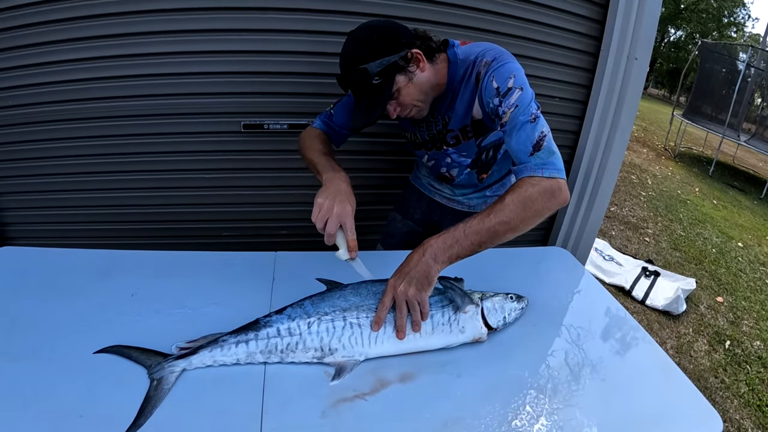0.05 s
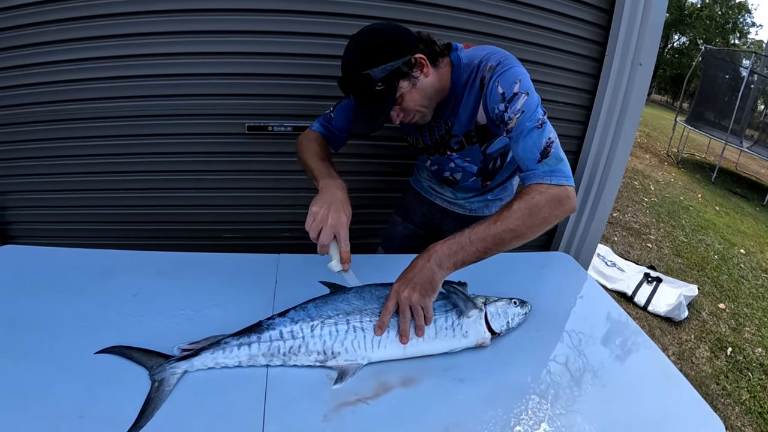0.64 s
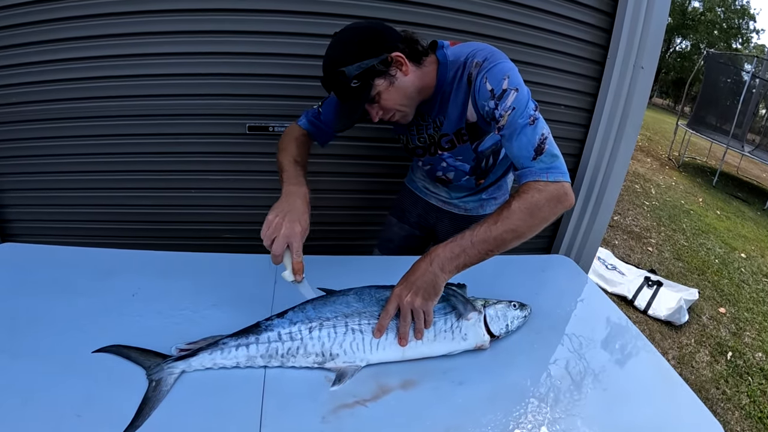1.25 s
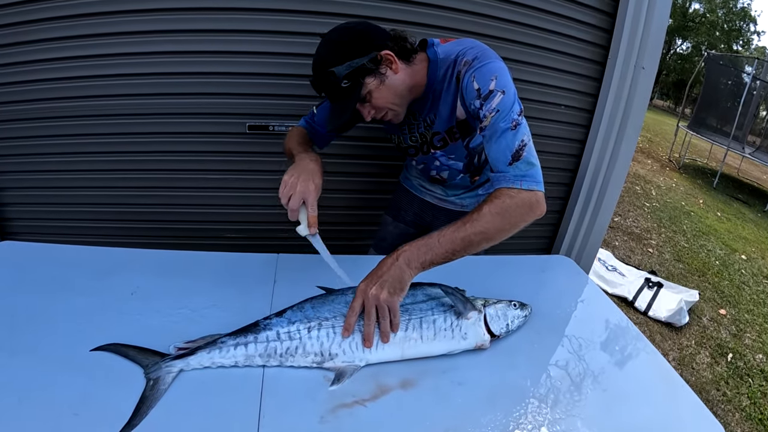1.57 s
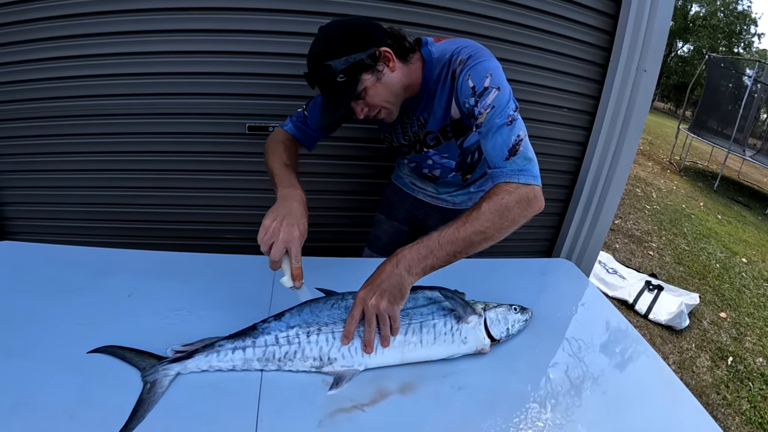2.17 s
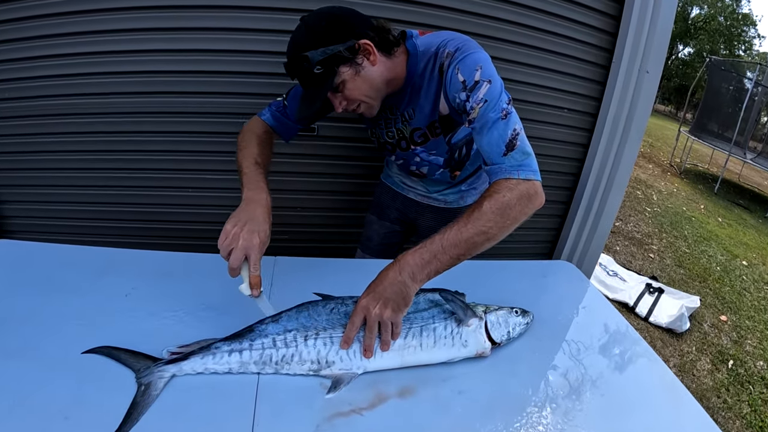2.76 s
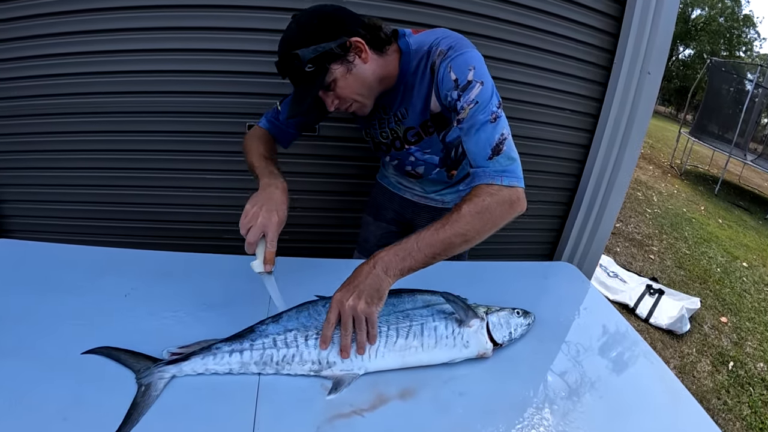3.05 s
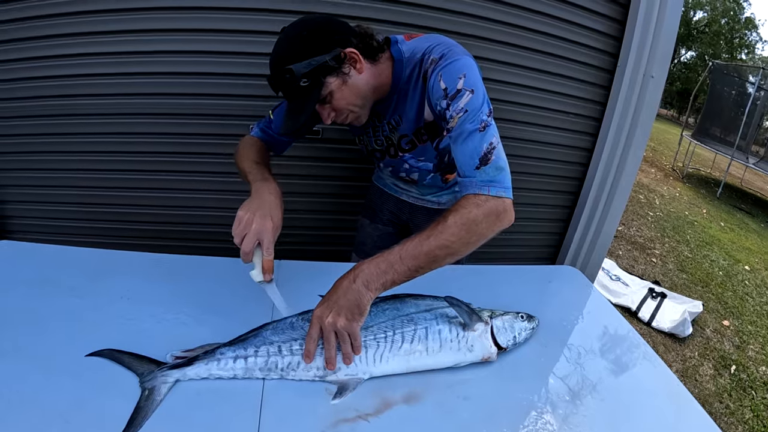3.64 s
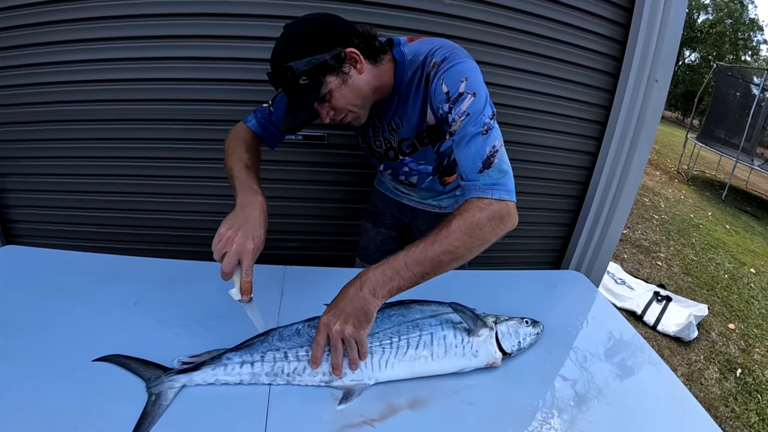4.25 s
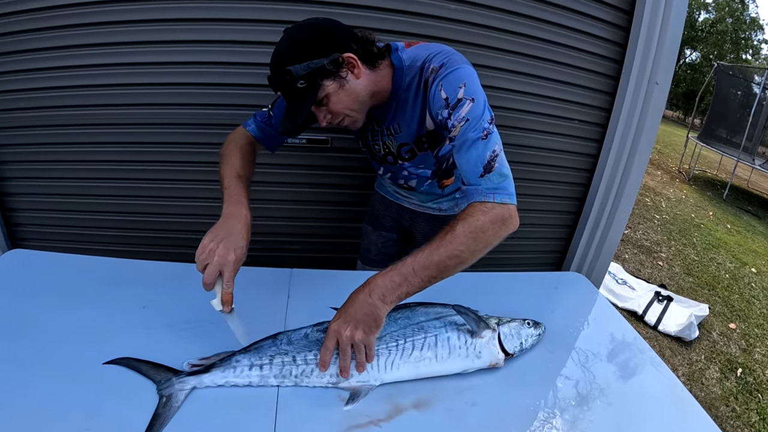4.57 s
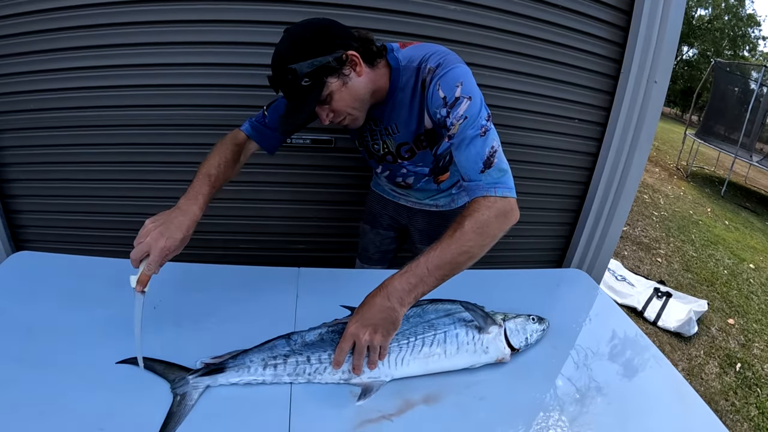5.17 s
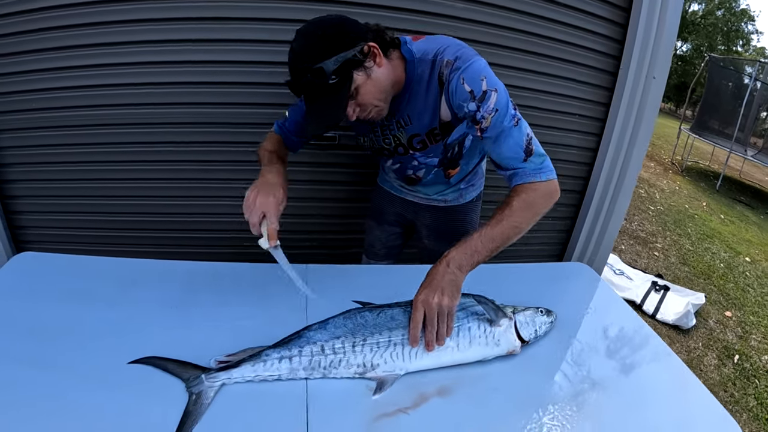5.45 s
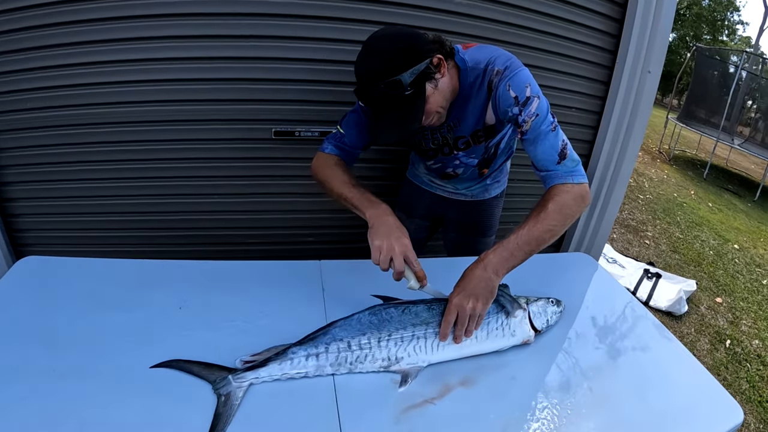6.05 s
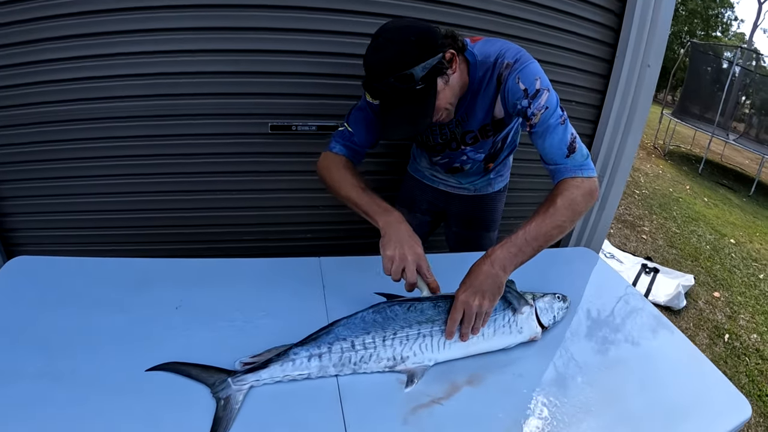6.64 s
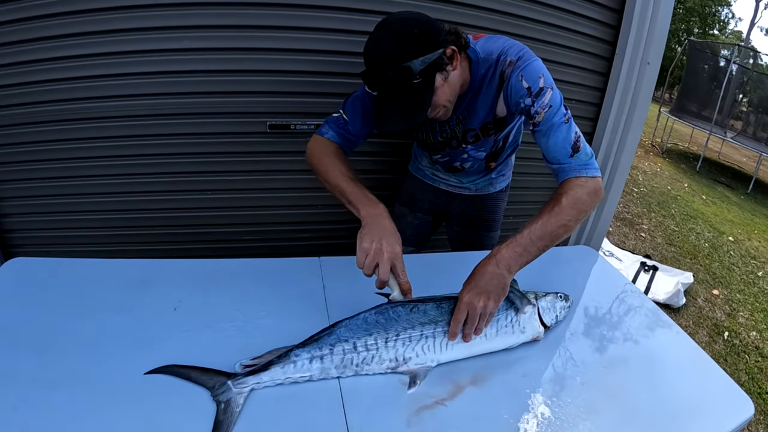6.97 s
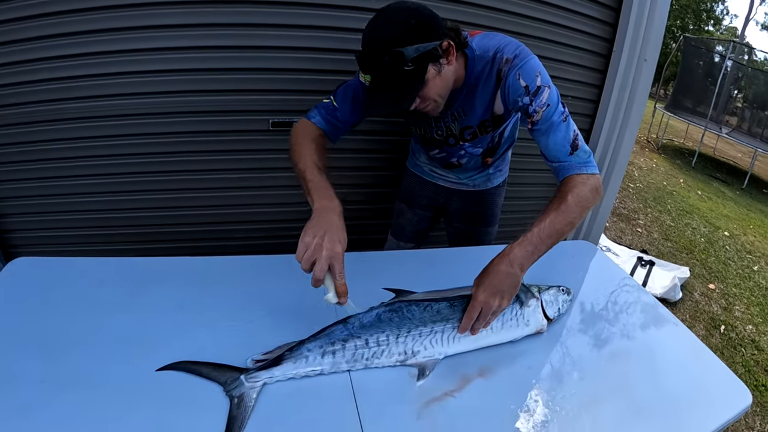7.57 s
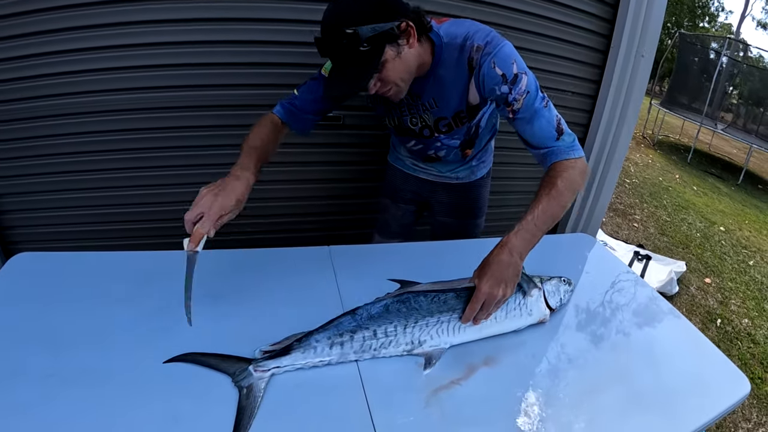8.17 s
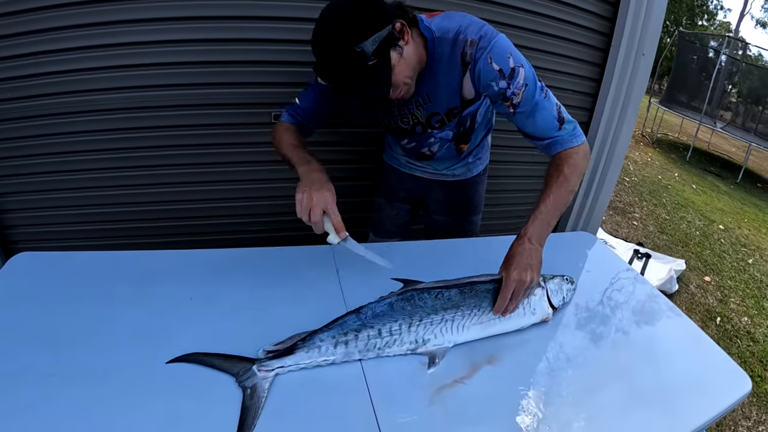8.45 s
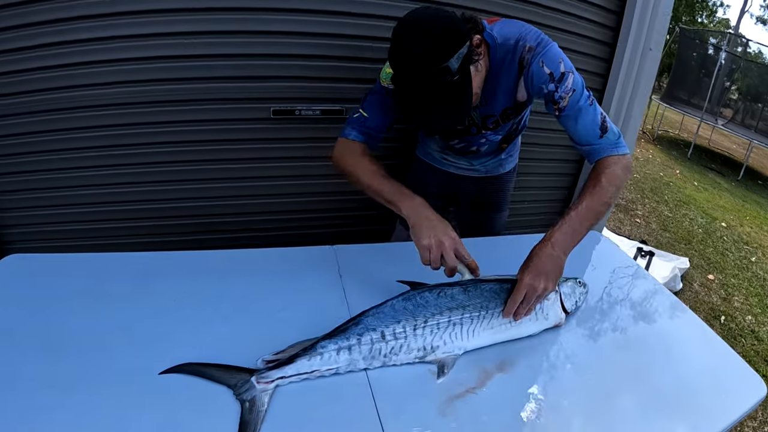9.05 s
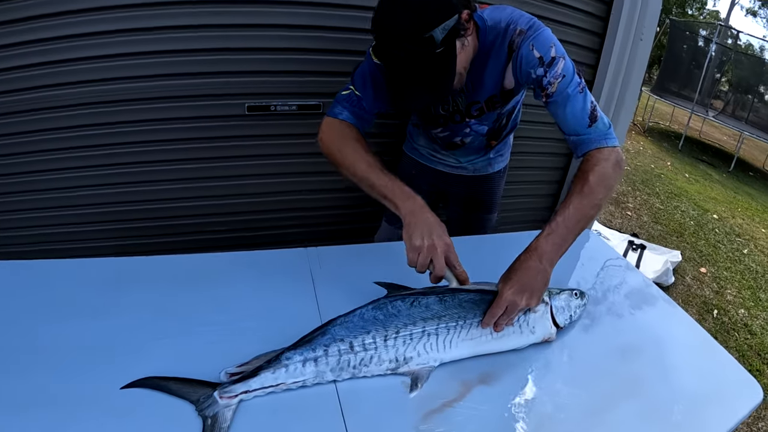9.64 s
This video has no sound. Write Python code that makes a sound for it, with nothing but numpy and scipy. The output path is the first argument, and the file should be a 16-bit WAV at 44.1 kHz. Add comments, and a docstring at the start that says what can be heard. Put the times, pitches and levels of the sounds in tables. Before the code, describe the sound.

A knife rasps and clicks through a fish outdoors, over the low throb of a distant helicopter and wind on the microphone.

```python
"""A knife fillets a fish on a plastic table in a yard. The edge rasps through skin and small bones,
the springy blade flicks out of two long cuts and jolts the fish, and a bone cracks near the head.
Far off a helicopter passes, each rotor blade giving a thump, a slap and a swirl of air.
Behind it are a soft wash of air, gusts on the microphone and faint bird calls."""
import sys
import numpy as np
from scipy import signal
from scipy.fft import rfft, irfft, next_fast_len
from scipy.io import wavfile
from scipy.ndimage import uniform_filter1d

SR = 44100
rng = np.random.default_rng(int(sys.argv[2]) if len(sys.argv) > 2 else 0)


def unload_audio(sound):
    """Save the sound as a 16-bit wav file, at the path given as the first command line argument."""
    columns = np.transpose(np.atleast_2d(sound))
    # keep every value between -1 and 1, then stretch to whole-number steps
    steps = np.round(np.clip(columns, -1, 1) * 32767)
    wavfile.write(sys.argv[1], SR, steps.astype(np.int16))


N = 432621
TIME = np.arange(N) / SR
SIDES = np.array([[1], [-1]])  # left, right
TOP_HZ = 14400


def undb(db):
    """Decibels to gain."""
    return 10 ** (np.asarray(db) / 20)


def unit(x):
    """Scale to rms 1."""
    return x / np.sqrt(np.mean(x ** 2) + 1e-18)


def curves(table):
    """Interpolate each column over the times in the first."""
    times, *columns = np.transpose(table)
    return [np.interp(TIME, times, column) for column in columns]


def add(track, start_s, sound):
    """Mix a sound into a track."""
    i = max(int(start_s * SR), 0)
    track[i:i + len(sound)] += sound[:max(N - i, 0)]


def colour(x, spectrum, causal=False):
    """Filter by (Hz, dB) points, keeping the power of white noise; causal for sharp attacks."""
    size = next_fast_len(N + SR // 2, True) // 2 * 2
    hz, db = np.transpose(spectrum)
    bin_hz = np.fft.rfftfreq(size, 1 / SR) + 1
    gain = undb(np.interp(np.log(bin_hz), np.log(hz), db))
    gain = unit(gain / (1 + (bin_hz / hz[-1]) ** 4))
    if causal:  # minimum phase
        cepstrum = irfft(np.log(gain + 1e-9))
        gain = np.exp(rfft(2 * cepstrum[:size // 2], size) - cepstrum[0])
    return irfft(rfft(x, size) * gain)[..., :N]


def noise():
    """White noise, rms 1."""
    return rng.standard_normal(N)


def drift(rate_hz):
    """Random steps smoothed twice, rms 1."""
    hold = int(SR / rate_hz)
    steps = np.repeat(rng.standard_normal(N // hold + 1), hold)
    return unit(uniform_filter1d(uniform_filter1d(steps, hold), hold)[:N])


def decay(t60_s):
    """Exponential decay to -60 dB."""
    return np.exp(-np.log(1000) * np.arange(int(t60_s * SR) + 2) / (t60_s * SR))


def burst(db, t60_s, grit_db):
    """A sudden release: gritty noise that dies away."""
    envelope = decay(t60_s)
    carrier, grit = rng.standard_normal((len(envelope), 2)).T
    sound = envelope * carrier * undb(grit_db * grit)
    return undb(db) * sound * np.linalg.norm(envelope) / np.linalg.norm(sound)


def bursts(table, grit_db):
    """A track with one burst per row."""
    track = np.zeros(N)
    for start_s, db, t60_s, *_ in table:
        add(track, start_s, burst(db, t60_s, grit_db))
    return track


def reflections(x, t60_s):
    """Diffuse reflections from the yard."""
    envelope = decay(t60_s)
    tail = envelope * rng.standard_normal(len(envelope))
    return signal.fftconvolve(x, tail / np.linalg.norm(tail))[:N]


def spread(x, wet_db, t60_s, pan_db):
    """Panned direct sound plus reflections off table and door, opposite in the two channels."""
    reflected = undb(wet_db) * reflections(x, t60_s)
    return undb(SIDES * pan_db / 2) * x + SIDES * reflected


# Distant rotor wash and outdoor hiss. Each row: frequency in Hz, relative level in dB.
WASH_SPECTRUM = [(200, -20), (400, 10.5), (540, 1), (750, 6), (1000, -0.5), (1400, -4.5), (2000, -37),
                 (4000, -34.5)]
HISS_SPECTRUM = [(500, -4), (1400, 9.5), (2200, 4.5), (3300, 4.5), (4300, -0.5), (5500, -2), (7200, -7),
                 (8500, -13), (10500, -15), (12000, -20), (14500, -30.5)]
# Each row: time in seconds, level in dB.
WASH_LEVELS = [(0, -56.5), (1.0, -54), (2.1, -82), (3.6, -65.5), (5.1, -55.5), (5.5, -58), (5.85, -50.5),
               (6.6, -56), (7.3, -54), (8.65, -47.5), (9.2, -54.5), (9.8, -53.5)]
HISS_LEVELS = [(0, -51.5), (0.7, -55.5), (1.7, -59.5), (3.8, -59), (6.3, -59), (7.4, -58), (8.4, -57.5),
               (9.8, -55.5)]
def air():
    """Distant rotor wash and outdoor hiss, both wavering slowly."""
    wash = colour(noise() * undb(SIDES * .5) + SIDES * undb(-16) * noise(), WASH_SPECTRUM)
    wash *= undb(curves(WASH_LEVELS)[0] + .9 * drift(12))
    hiss = colour(noise() * undb(SIDES * .34) + SIDES * undb(-13) * noise(), HISS_SPECTRUM)
    hiss *= undb(curves(HISS_LEVELS)[0] + .86 * drift(6.6))
    return wash + hiss


# Thin whines. Each row: start in seconds, length in seconds, pitch in Hz, level in dB, flutter in Hz.
WHINES = [(4.85, .45, 5100, -69, 400), (5.198, 0.69, 2960, -67, 350), (5.601, 0.89, 750, -57, 300),
          (6.95, 0.55, 3520, -68.5, 500), (7.3, 0.62, 3680, -66, 550), (7.402, 2.4, 1437, -65.5, 300),
          (7.8, .34, 3580, -56, 550), (8.3, .5, 850, -57, 350)]
def whines():
    """Faint, narrow bands of noise fade in and out."""
    track = np.zeros(N)
    for start_s, length_s, hz, db, flutter_hz in WHINES:
        count = int(length_s * SR)
        phase = 2 * np.pi * hz * TIME
        band = drift(flutter_hz) * np.cos(phase) + drift(flutter_hz) * np.sin(phase)
        band = unit(band * undb(3.5 * drift(60)))
        add(track, start_s, undb(db) * np.sqrt(np.hanning(count)) * band[:count])
    return track


# Bird notes. Each row: start and length in seconds, first and last pitch in Hz, level in dB, waver in Hz.
BIRD_NOTES = [(5.655, .08, 810, 790, -49, 25), (6.035, .05, 3650, 3200, -51, 110),
              (6.303, .048, 2580, 3050, -52, 60), (6.345, .04, 3080, 3160, -58, 110),
              (7.035, .06, 2750, 2920, -52, 45), (7.078, .035, 3250, 3400, -54.5, 70),
              (8.68, .1, 780, 800, -47, 25), (9.24, .09, 1850, 2350, -55, 35)]
def birds():
    """Short gliding whistles and low hoots from the trees."""
    track = np.zeros(N)
    waver = drift(900)
    for start_s, length_s, first_hz, last_hz, db, waver_hz in BIRD_NOTES:
        count = int(length_s * SR)
        hz = np.linspace(first_hz, last_hz, count) + waver_hz * waver[int(start_s * SR):][:count]
        add(track, start_s, undb(db) * np.hanning(count) * np.sin(2 * np.pi * np.cumsum(hz) / SR))
    return spread(track, wet_db=-10, t60_s=.2, pan_db=.5)


# Wind buffeting. Each row: frequency in Hz, relative level in dB.
WIND_SPECTRUM = [(10, -1), (25, 10), (70, 5), (130, -7.5), (220, -18.5), (330, -26), (600, -31), (800, -29),
                 (1300, -40.5)]
# Each row: time in seconds, level in dB.
GUST_LEVELS = [(0, -22.5), (.7, -26), (1.15, -27), (1.55, -20.5), (2.1, -28.5), (4.3, -32), (7.0, -30.5),
               (8.05, -30), (8.6, -36)]
def wind():
    """Gusts rumble on the microphone, alike in both channels apart from small eddies."""
    gusts = unit(colour(noise(), WIND_SPECTRUM)) * undb(curves(GUST_LEVELS)[0] + .98 * drift(14))
    eddies = undb(-53.5) * unit(colour(noise(), WIND_SPECTRUM))
    return gusts + SIDES * eddies


def blade_pulses(passages, jitter_db):
    """One suction pulse per rotor blade passage, uneven in strength."""
    at = np.flatnonzero(np.diff(np.floor(passages)))
    pulses = np.zeros(N)
    pulses[at] = -undb(jitter_db * rng.standard_normal(len(at)))
    return unit(pulses)


# Rotor thump. Each row: frequency in Hz, relative level in dB.
THUMP_SPECTRUM = [(6, -27), (11, -12), (23, -2), (34, -5), (45, 1), (57, 1), (68, -3), (80, -11),
                  (100, -22), (160, -42)]
# Each row: time in seconds, levels of the deep, middle and upper band in dB.
THUMP_BAND_LEVELS = [(0, -33, -37, -34.5), (.4, -39, -51, -31.5), (.85, -40, -52, -36),
                     (1.3, -35, -49, -22.5), (1.7, -29.5, -34, -25), (2.1, -33.5, -28, -33),
                     (2.8, -37, -32, -33), (3.3, -35, -28, -29.5), (3.8, -44, -22, -30),
                     (4.05, -41, -34.5, -32), (4.4, -36, -31, -39), (4.9, -33, -29, -35.5),
                     (5.6, -31, -28, -29), (6.1, -27, -23.5, -29), (6.52, -31, -31.5, -38),
                     (6.85, -33, -24, -32.5), (7.4, -38.5, -26, -30), (7.95, -49, -23, -27),
                     (8.5, -48, -27, -30), (9.1, -43, -28.5, -36), (9.8, -39, -30.5, -45)]
def rotor_thump(passages):
    """Each blade's slow pressure wave; three bands swell and fade as the ground echo's path changes."""
    beat = blade_pulses(passages + .07, jitter_db=.7)  # just ahead of the slap
    wall_echo = blade_pulses(passages - .38 + .03 * drift(1.5), jitter_db=2)
    throb = 1 + .2 * np.cos(2 * np.pi * (passages - .12))
    thump = throb * colour(beat + .2 * wall_echo + .22 * noise(), THUMP_SPECTRUM, causal=True)
    spectrum, bin_hz = rfft(thump), np.fft.rfftfreq(N, 1 / SR)
    deep, lower = (irfft(spectrum / (1 + (bin_hz / split_hz) ** 24), N) for split_hz in (40, 51))
    bands = deep, lower - deep, thump - lower
    return sum(unit(band) * undb(db) for band, db in zip(bands, curves(THUMP_BAND_LEVELS)))


# Lower slap resonance. Each row: frequency in Hz, relative level in dB.
SLAP_SPECTRUM = [(110, -30), (150, 0), (175, 3.5), (205, 2), (240, 3.5), (268, -3), (315, -13), (390, -24),
                 (520, -27), (1000, -46.5)]
# Each row: time in seconds, power share of the higher resonance from 0 to 1.
SLAP_HIGH_SHARE = [(0, 0.3), (.5, 0.01), (.95, 1), (1.35, 0.6), (1.8, 0.43), (2.2, 0.32), (2.7, 0.24),
                   (3.3, 0.26), (3.9, 0.3), (4.5, 0.18), (6.0, .25), (7.4, 0), (8.3, 0.49), (9.8, .15)]
def rotor_slap(pulses, swirl):
    """A blade hits the last blade's vortex; the resonance shifts as the sound's path changes."""
    high_share = curves(SLAP_HIGH_SHARE)[0]
    slap = np.zeros(N)
    for share, pitch_ratio in ((1 - high_share, 1), (high_share, 1.2)):
        resonance = [(hz * pitch_ratio, db) for hz, db in SLAP_SPECTRUM]
        rattle = unit(colour(reflections(pulses, t60_s=.3), resonance))
        rush = colour(.3 * pulses + noise(), resonance)
        slap += np.sqrt(share) * unit(swirl * rattle + .65 * rush)
    return slap


# Rotor hums. Each row: time in seconds, levels of blade-rate harmonics 11 and 14 in dB.
HUM_LEVELS = [(5.3, -42, -58), (6.1, -29, -44), (6.5, -44, -39), (7.05, -42, -49), (7.45, -32, -44),
              (7.8, -38, -35), (8.3, -39, -35), (8.8, -48, -48), (9.8, -54, -50)]
def rotor_hum(passages):
    """Two harmonics of the blade rate swell and waver."""
    hum = sum(undb(db) * np.cos(2 * np.pi * harmonic * passages + .45 * drift(9))
              for harmonic, db in zip((11, 14), curves(HUM_LEVELS)))
    return hum * undb(1.5 * drift(4.9))


BLADE_RATE_HZ, MACH = 11.384, .0188
CLOSEST_S, PASS_WIDTH_S = 4.0, 2.2
# Air churned by the rotor. Each row: frequency in Hz, relative level in dB.
CHURN_SPECTRUM = [(30, -18.5), (70, -15.5), (100, 7.5), (125, 4), (160, -1.5), (190, -4), (260, -33.5),
                  (450, -45.5), (900, -80)]
# Each row: time in seconds, churn level in dB, slap level in dB.
ROTOR_LEVELS = [(0, -33.5, -32), (0.3, -25, -36), (0.8, -37.5, -36.5), (1.3, -36.5, -31),
                (1.85, -27.5, -30.5), (2.2, -36.5, -52), (2.5, -48, -37), (3.0, -45, -40.5),
                (3.65, -36.5, -36.5), (4.2, -41.5, -38), (4.7, -45.5, -47), (5.4, -39, -42.5),
                (5.95, -35.5, -36.5), (6.5, -37.5, -43), (7.05, -36, -41.5), (7.45, -34.5, -37),
                (7.9, -37.5, -39.5), (8.5, -38, -38.5), (9.2, -39, -39), (9.8, -43.5, -46.5)]
def helicopter():
    """The rotor thumps, churns, slaps and hums on a straight fly-by; its beat slows as it leaves."""
    delay_s = MACH * np.hypot(TIME - CLOSEST_S, PASS_WIDTH_S)
    passages = .233 + BLADE_RATE_HZ * (TIME - delay_s)
    swirl = .45 + np.exp(2.5 * (np.cos(2 * np.pi * passages) - 1))
    pulses = blade_pulses(passages, jitter_db=1.8)
    echoes = reflections(blade_pulses(passages + .07, jitter_db=.7), t60_s=.3)
    churn_db, slap_db = curves(ROTOR_LEVELS)
    turbulence = .25 * pulses + .5 * echoes + .9 * swirl * noise()
    churn = undb(churn_db) * unit(colour(turbulence, CHURN_SPECTRUM))
    slap = undb(slap_db) * rotor_slap(pulses, swirl)
    return rotor_thump(passages) + churn + slap + rotor_hum(passages)


# Plastic table. Each row: frequency in Hz, relative level in dB.
TABLE_SPECTRUM = [(60, -10), (130, -5), (220, 3), (330, -2), (450, -10), (700, -15), (1300, -19),
                  (2500, -41)]
# Each row: start in seconds, level in dB, t60 in seconds.
THUDS = [(5.257, -31, 0.24), (8.15, -27, 0.14)]
def table_thuds():
    """The fish jolts on the table."""
    return colour(bursts(THUDS, grit_db=-2.5), TABLE_SPECTRUM, causal=True)


SNAP_DB, SPLINTER_DB, SPLINTER_LAG_S = 15, -4, .0008
# Breaking bone. Each row: frequency in Hz, relative level in dB.
BONE_SPECTRUM = [(200, -24), (700, -11), (1200, -4.5), (1700, 1.5), (2150, 3), (2900, -3.5), (3600, -15),
                 (4300, -16), (4900, -12), (7000, -22), (9000, -33), (13000, -38), (14500, -55)]
# Each row: start in seconds, base level in dB, splinter t60 in seconds.
BONE_SNAPS = [(9.012, -37.5, 0.018), (9.020, -43, .08), (9.028, -40, .03), (9.032, -34, 0.018),
              (9.0355, -17.5, 0.008), (9.041, -26, 0.026), (9.0465, -25, 0.026), (9.055, -19, 0.01),
              (9.061, -35, 0.04), (9.071, -41, .03), (9.085, -47, .09)]
def bone_crack():
    """A bone gives way in quick snaps, each a clean break followed by splintering grit."""
    splinters = [(start_s + SPLINTER_LAG_S, db, t60_s) for start_s, db, t60_s in BONE_SNAPS]
    snaps = undb(SPLINTER_DB) * bursts(splinters, grit_db=3)
    for start_s, db, _ in BONE_SNAPS:
        add(snaps, start_s, undb([db + SNAP_DB]))
    crack = colour(snaps, BONE_SPECTRUM, causal=True)
    crack += undb(-14) * reflections(crack, t60_s=.15)
    return spread(crack, wet_db=-15, t60_s=.13, pan_db=2.5)


# Knife bending modes. Each row: frequency in Hz, bandwidth in Hz, relative level in dB.
KNIFE_MODES = [(2650, 260, -3), (3120, 200, 2), (3680, 260, 1), (4100, 200, -7), (5090, 110, 2),
               (5850, 200, -8), (7150, 350, -4), (8300, 200, -12), (9900, 500, -16)]
def knife_ring(drive):
    """The thin blade rings in its bending modes, damped by flesh."""
    t = np.arange(SR // 10) / SR
    response = np.zeros(len(t))
    for k, (hz, width_hz, db) in enumerate(KNIFE_MODES):
        envelope = undb(db) * width_hz * np.exp(-np.pi * width_hz * t)
        response += (-1) ** k * envelope * np.sin(2 * np.pi * hz * t)
    return signal.fftconvolve(drive, response / np.linalg.norm(response))[:N]


# Scraping steel. Each row: frequency in Hz, relative level in dB.
STEEL_SPECTRUM = [(300, -4), (800, 0), (1500, 0), (2000, -1), (2500, -2.5), (3100, 4.5), (3900, -2.5),
                  (4500, -1), (5200, -7), (6200, -4.5), (7100, -2), (8000, -12), (10000, -8.5),
                  (14000, -12)]
# Each row: start in seconds, scrape level in dB, scrape t60 in seconds,
# lower mode in Hz, its level in dB, upper mode in Hz, its level in dB.
FLICKS = [(5.243, -37, 0.044, 3090, -34, 3690, -29), (5.245, -41, 0.05, 2840, -43, 7200, -38),
          (5.257, -43, 0.13, 3200, -42, 5160, -44), (5.273, -64, 0.048, 2830, -40.5, 3300, -54),
          (8.14, -29.5, 0.062, 2710, -31, 3110, -29.5), (8.146, -29, 0.061, 3120, -29, 5110, -33),
          (8.153, -30, 0.07, 2430, -32, 5130, -30), (8.178, -51, 0.1, 2780, -35.5, 3250, -46)]
def knife_flicks():
    """The blade springs free of the skin; two modes waver as it flexes, damped by hand and flesh."""
    scrape = colour(bursts(FLICKS, grit_db=.5), STEEL_SPECTRUM, causal=True)
    ring = undb(-5.5) * knife_ring(bursts(FLICKS, grit_db=3))
    twang, envelope = np.zeros(N), decay(t60_s=.028)
    flex = 1 + .018 * drift(700)
    for start_s, _, _, lower_hz, lower_db, upper_hz, upper_db in FLICKS:
        warped_s = np.cumsum(flex[int(start_s * SR):][:len(envelope)]) / SR
        for hz, db in ((lower_hz, lower_db), (upper_hz, upper_db)):
            add(twang, start_s, undb(db) * np.sqrt(2) * envelope * np.sin(2 * np.pi * hz * warped_s))
    return scrape + ring + twang


def wet_pops(centre_hz, count, t60_s, pitch_scatter):
    """Tiny wet bursts at random moments, each with its own size and a pitch near the moving centre."""
    at = rng.integers(0, N, count)
    detune, size = rng.standard_normal((count, 2)).T
    envelope = decay(t60_s)
    offsets = np.arange(len(envelope))
    hz = np.minimum(centre_hz[at] * np.exp(pitch_scatter * detune), TOP_HZ)
    gain = undb(4.5 * np.clip(size, -2, 2))
    waves = gain[:, None] * envelope * np.sin(2 * np.pi * hz[:, None] * offsets / SR)
    return unit(np.bincount((at[:, None] + offsets).ravel(), waves.ravel(), N)[:N])


# Edge ticks. Each row: start in seconds, level in dB, t60 in seconds, centre in Hz.
TICKS = [(.944, -43.5, .035, 4400), (.977, -48, .015, 5500), (.994, -51, .015, 3800),
         (1.025, -44.5, .014, 4200), (1.097, -49, .04, 5500), (1.110, -44, .02, 3200),
         (1.177, -52, .04, 3200), (1.206, -52, .012, 2800), (1.337, -54, .03, 3800),
         (1.371, -49, .012, 2600), (1.383, -50, .025, 3900), (2.453, -48, .025, 3900),
         (2.537, -49, .02, 2900), (2.577, -45, .025, 2800), (2.727, -42, .03, 2900),
         (2.777, -46, .035, 4200), (2.846, -49, .02, 2900), (4.221, -49, .02, 3300),
         (4.369, -43.5, .03, 2550), (4.519, -45, .012, 3400), (4.617, -44, .04, 3400),
         (4.883, -50, .02, 3500), (5.501, -51, .03, 4500), (7.977, -43, .015, 3200),
         (8.017, -41, .02, 3600), (8.052, -43, .015, 4300), (8.078, -40.5, .025, 4200),
         (8.105, -47, .025, 5200), (8.94, -48, .015, 2200), (9.582, -48, .012, 3200),
         (9.628, -37.5, .012, 3500)]
def edge_ticks(splash_spectrum):
    """The edge jumps over scales and fin rays: each gives a pitched click and a broadband splash."""
    clicks = np.zeros(N)
    for start_s, db, t60_s, hz in TICKS:
        kick = burst(db, t60_s, grit_db=3)
        resonance = signal.iirpeak(hz, Q=1.9, fs=SR)
        click = signal.lfilter(*resonance, signal.lfilter(*resonance, kick))
        add(clicks, start_s, click * np.linalg.norm(kick) / np.linalg.norm(click))
    return clicks + undb(-9) * colour(bursts(TICKS, grit_db=3), splash_spectrum, causal=True)


BITE_SHARE, LET_GO_S = .18, .16
# Short sawing strokes and long draws along the backbone. Each row: start in seconds, length in seconds,
# rasp level in dB, crunch pitch in Hz, crunch level in dB, sizzle pitch in Hz.
SAW_STROKES = [(0.95, 0.25, -58, 4400, -61, 9900), (1.151, 0.11, -60, 2900, -57, 12500),
               (1.292, 0.13, -59, 3280, -56, 12600), (2.268, 0.14, -63, 3500, -65, 11500),
               (2.425, 0.13, -58.5, 3740, -61, 9900), (2.55, 0.13, -63, 2900, -63.5, 10000),
               (2.72, 0.07, -54.5, 2900, -63, 12100), (2.762, .06, -66, 3870, -64, 12000),
               (2.822, 0.08, -60.5, 2850, -57.5, 12500), (2.89, .07, -64, 3000, -66, 12000),
               (4.205, 0.083, -54.5, 3100, -64, 12000), (4.352, 0.055, -56, 2400, -49.5, 12000),
               (4.497, 0.059, -54, 3400, -63, 9800), (4.612, 0.05, -53, 2300, -56, 9400),
               (4.68, 0.066, -74, 2700, -62, 10500), (4.77, 0.042, -66, 3000, -60, 10000),
               (4.857, 0.1, -59, 3480, -64, 9800), (4.965, 0.076, -57, 3700, -61, 11800),
               (5.49, 0.073, -60, 4500, -67, 10000), (6.035, 0.043, -68, 3420, -53, 9900),
               (6.74, 0.19, -65, 3400, -64, 10500), (7.6, 0.11, -71, 4200, -64, 11000),
               (7.85, 0.038, -63, 4500, -62, 11000), (7.93, 0.083, -52, 3300, -60, 11300),
               (7.997, .08, -57, 3400, -59, 11100)]
LONG_DRAWS = [(2.2, .8, -71, 2870, -66, 10500), (4.25, 0.81, -65, 3000, -68, 10400),
              (4.99, 0.32, -54, 3580, -55, 10400), (7.294, 0.89, -60.5, 3570, -76, 10900),
              (7.91, 0.34, -54, 5440, -55.5, 11000), (8.77, 0.42, -53.5, 2200, -52, 9400),
              (9.3, 0.48, -63.5, 3520, -73, 10700)]
def cut_controls():
    """Gains and pitches of the cuts: strokes bite early and ease off, draws swell and let go."""
    def stroke(progress, length_s):
        return np.interp(progress, [0, BITE_SHARE, 1], [0, 1, 0]) ** .65

    def draw(progress, length_s):
        return progress ** .76 * np.minimum((1 - progress) * length_s / LET_GO_S, 1)

    rasp_gain, crunch_gain, crunch_sum, sizzle_sum = np.zeros((4, N))
    for table, shape in ((SAW_STROKES, stroke), (LONG_DRAWS, draw)):
        for start_s, length_s, rasp_db, crunch_hz, crunch_db, sizzle_hz in table:
            envelope = shape(np.linspace(0, 1, int(length_s * SR)), length_s)
            add(rasp_gain, start_s, undb(rasp_db) * envelope)
            add(crunch_gain, start_s, undb(crunch_db) * envelope)
            add(crunch_sum, start_s, crunch_hz * undb(crunch_db) * envelope)
            add(sizzle_sum, start_s, sizzle_hz * undb(rasp_db) * envelope)
    # overlapping cuts share a gain-weighted mean pitch
    active = rasp_gain > 0
    crunch_hz = np.interp(TIME, TIME[active], crunch_sum[active] / crunch_gain[active])
    sizzle_hz = np.interp(TIME, TIME[active], sizzle_sum[active] / rasp_gain[active])
    return rasp_gain, crunch_gain, crunch_hz, sizzle_hz


GRAINS_PER_S, RING_DB, SIZZLE_DB = 900, -6, -17
# Tearing flesh. Each row: frequency in Hz, relative level in dB.
FLESH_SPECTRUM = [(300, -9), (1000, 6.5), (2000, 7.5), (2800, 3.5), (3700, 2), (4500, -1.5), (5300, 1.5),
                  (7200, -4), (8300, -6.5), (10000, -7.5), (12500, -9.5), (14500, -23)]
def knife_cuts():
    """The edge tears fibres and scales in uneven pulls: rasp, ring, wet crunch, sizzle and ticks."""
    rasp_gain, crunch_gain, crunch_hz, sizzle_hz = cut_controls()
    grains = (rng.random(N) < GRAINS_PER_S / SR) * rng.choice([-1, 1], N)
    grains = grains * undb(-np.minimum(rng.exponential(size=N), 4))
    tearing = (unit(grains) + undb(-7) * noise()) * rasp_gain * undb(2.2 * drift(90) + .5)
    rasp = colour(tearing, FLESH_SPECTRUM, causal=True)
    crunch_hz *= np.exp(.06 * drift(35))
    crunch = crunch_gain * wet_pops(crunch_hz, count=4000, t60_s=.005, pitch_scatter=.17)
    sizzle = rasp_gain * wet_pops(sizzle_hz, count=8000, t60_s=.003, pitch_scatter=.06)
    ring = knife_ring(noise() * rasp_gain)
    return rasp + undb(RING_DB) * ring + crunch + undb(SIZZLE_DB) * sizzle + edge_ticks(FLESH_SPECTRUM)


def scene():
    """The yard and the far helicopter behind the close knife work, in stereo."""
    background = air() + whines() + birds() + wind() + helicopter()
    knife = spread(knife_cuts() + knife_flicks(), wet_db=-10.5, t60_s=.04, pan_db=1.4)
    return background + table_thuds() + bone_crack() + knife


def record(dry):
    """A steep low-pass cuts the top treble."""
    return signal.sosfilt(signal.ellip(10, .2, 80, TOP_HZ, fs=SR, output="sos"), dry)


dry = scene()
out = record(dry)
unload_audio(out)
```